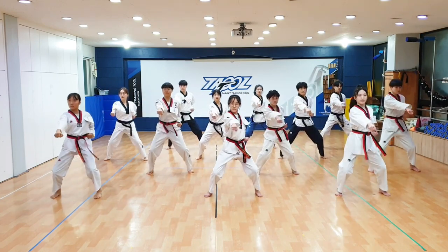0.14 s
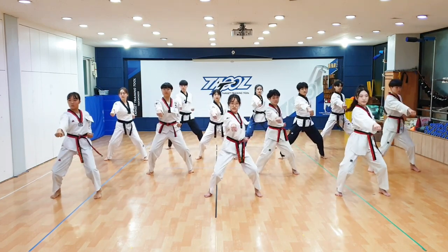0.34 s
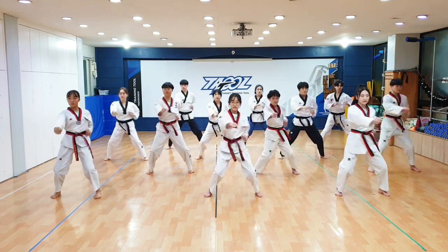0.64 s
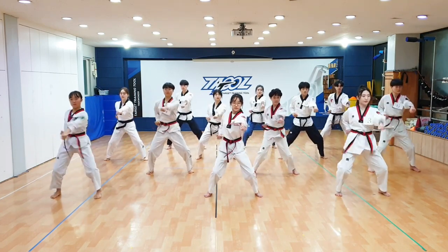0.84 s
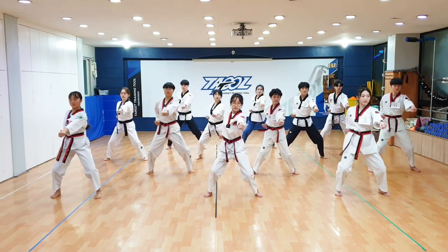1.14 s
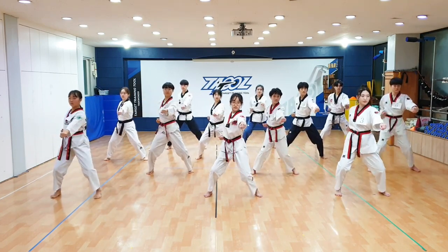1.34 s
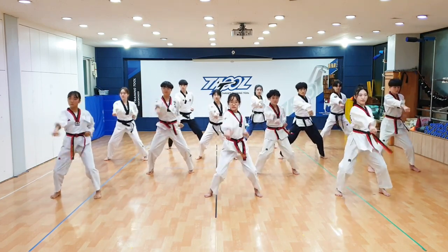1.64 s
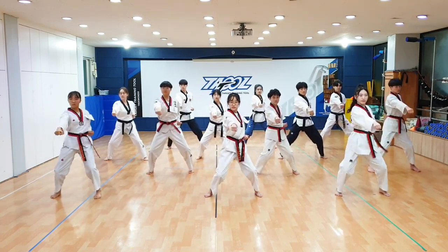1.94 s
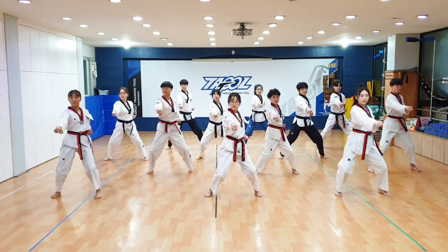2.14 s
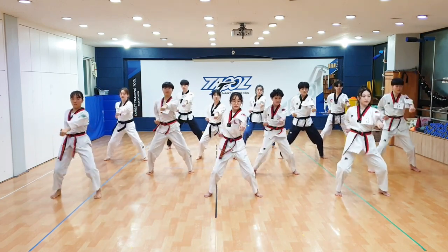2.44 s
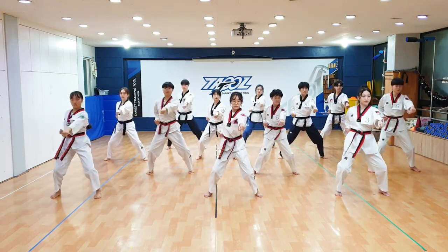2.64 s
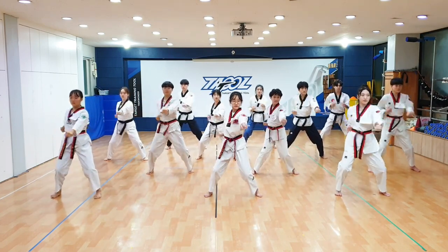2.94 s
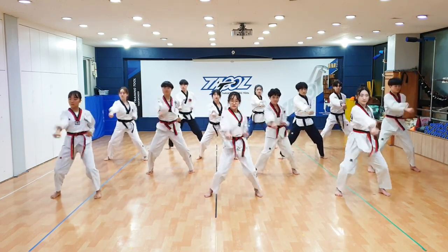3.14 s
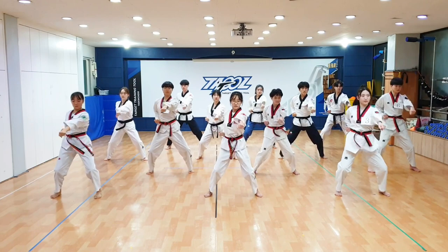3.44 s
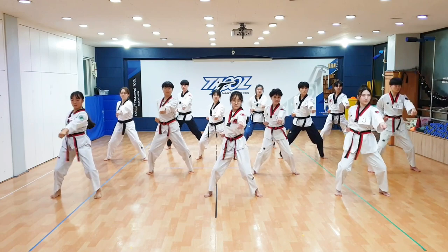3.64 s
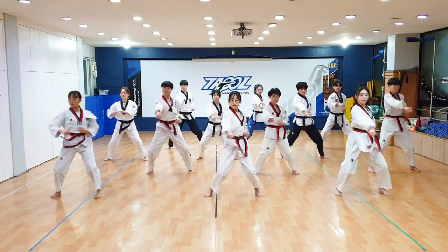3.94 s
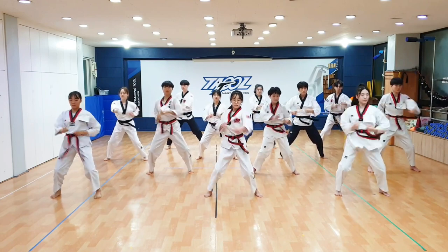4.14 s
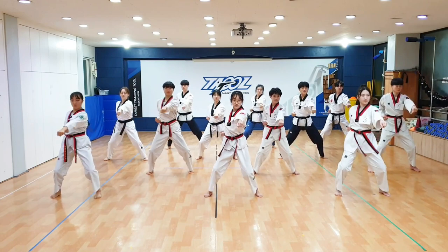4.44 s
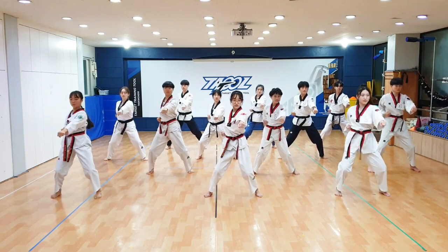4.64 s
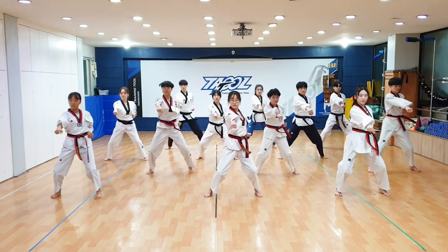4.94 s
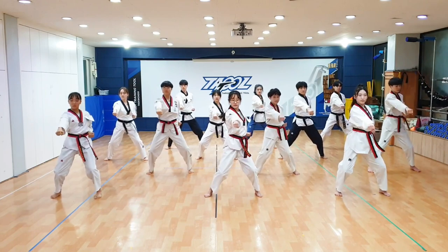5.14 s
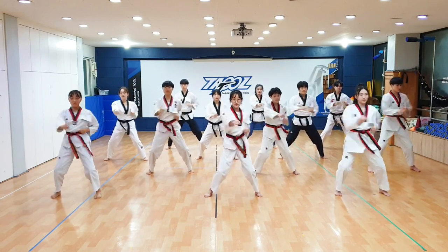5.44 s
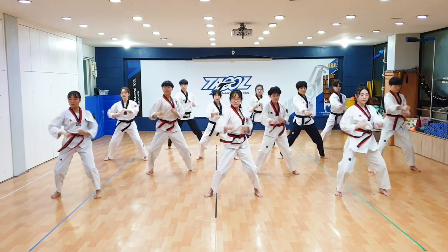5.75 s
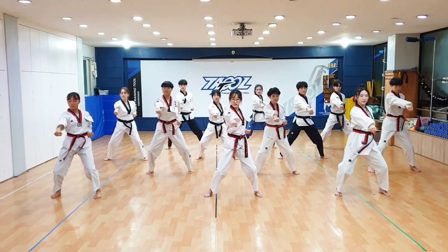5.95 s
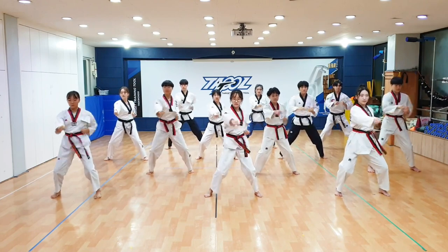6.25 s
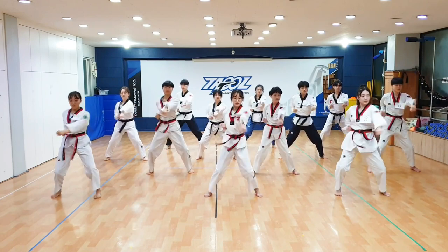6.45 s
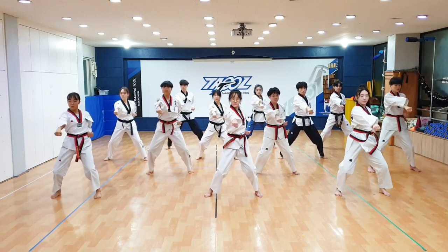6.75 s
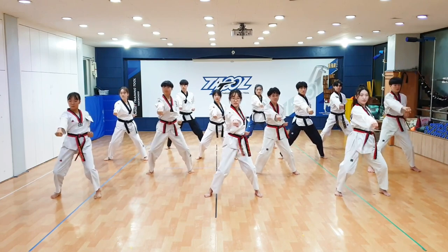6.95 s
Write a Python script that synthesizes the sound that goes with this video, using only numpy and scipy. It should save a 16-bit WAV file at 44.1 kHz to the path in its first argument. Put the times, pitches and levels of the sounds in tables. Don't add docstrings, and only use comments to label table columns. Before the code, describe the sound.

Heavy cloth swishes and dull sleeve cracks land together, singly and in quick runs, in a live indoor hall with soft ventilation noise.

```python
import sys
import numpy as np
from scipy import signal
from scipy.fft import rfft, irfft, next_fast_len
from scipy.io import wavfile

SR = 44100
rng = np.random.default_rng(int(sys.argv[2]) if len(sys.argv) > 2 else 0)


def how_loud(loudness_db):
    steps = np.asarray(loudness_db, float) / 20
    return 10 ** steps


def output_pcm(signal):
    pcm = np.clip(np.atleast_2d(signal).T, -1, 1) * 32767
    wavfile.write(sys.argv[1], SR, np.round(pcm).astype(np.int16))


N = 312986
SIZE = next_fast_len(N + SR)


# body jolt, cloth flap, sleeve rub, weave hiss.
# Edges between the layers in Hz.
LAYER_EDGES_HZ = [44, 130, 1100, 4000, 17000]
FOLDS_PER_S = [150, 900, 4000, 9000]
FOLD_SPREAD_DB = [3.4, 5.2, 3.7, 1.5]


def uniforms(rows):
    out = 0
    free = hush() * flutter()
    lead = SR // 10
    for k, (low, high) in enumerate(zip(LAYER_EDGES_HZ, LAYER_EDGES_HZ[1:])):
        level = free * effort(k)
        for row in rows:
            part = band(row, low, high)
            part = part / np.sqrt(np.sum(part ** 2) / 2 * len(rows))
            grains = folds(FOLDS_PER_S[k], FOLD_SPREAD_DB[k])
            sent = np.zeros(SIZE)
            sent[:N] = level * grains
            sent[-lead:] = level[0] * grains[-lead:]
            out = out + through(sent, part)
    return out


# arm stops at in
# seconds, strength in dB, cloth keeps whipping for in seconds, brightness in dB, swing relative to strength in
# dB.
PUNCHES = [(0.0, -26, 0.053, -5, -1.5), (0.041, -33, .06, 8, -16), (0.821, -20.5, 0.06, 7.5, -9),
           (1.27, -51.5, 0.034, 1, -16), (1.485, -50.5, 0.067, 34, -9), (1.612, -20, 0.12, -1.5, -9.5),
           (2.314, -34, .06, 21, -30.5), (2.418, -21, 0.07, 7, -4), (3.03, -43.5, .06, 10, -7),
           (3.154, -21, 0.077, -7, -5.5), (3.27, -28.5, .05, 2, 0), (3.375, -20.5, 0.042, -7.5, -9),
           (3.437, -27, 0.031, 2, 0), (3.85, -43.5, 0.099, 13, -4.5), (4.006, -22, .11, -1.5, -6),
           (4.14, -28.5, 0.11, -1, -2), (4.24, -22.5, 0.11, -3.5, -2.5), (4.755, -48.5, .07, 25, -17),
           (4.891, -20.5, .13, -1.5, -8), (5.612, -20.5, 0.1, -7, -4.5), (5.825, -18.5, 0.068, -8.5, -3),
           (6.458, -25, 0.14, -6.5, -2.5), (6.648, -18.5, 0.095, -2, -6.5)]
LAYER_DB = [-14, -1.5, -6, -9]
LAYER_BRIGHT = [0.014, 0.061, 0.24, 0.37]
# when it breaks out after the stop, in seconds.
LAYER_LAG_S = [-.012, .001, .001, .001]
SWING_DB = [3.5, 2.5, 2.5, 5]
# growth as the arm speeds up towards the stop, in dB per second.
SWING_DB_PER_S = [168, 130, 121, 116]
# fall while the cloth keeps whipping, in dB per second.
SAG_DB_PER_S = [30, 27, 36, 43.6]
# further fall once it stops whipping, in dB per second.
RELEASE_DB_PER_S = [260, 222, 195, 188]
# level of each layer in dB, and its fall in dB per second.
SETTLE_DB, SETTLE_DB_PER_S = [-17, -21, -10.5, -14], 47.5


def effort(layer):
    swing_s, start_s = 0.2, 0.041
    whip_db, whip_s = 7, 0.037
    rise_s = 0.0081
    t = np.arange(0, N + 64, 64) / SR
    stop_s, db, hold_s, bright_db, swing_db = np.transpose(PUNCHES)[:, :, None]
    since = t - stop_s - LAYER_LAG_S[layer]
    after = np.maximum(since, 0)
    past = np.maximum(since - hold_s, 0)
    swing = how_loud(swing_db + SWING_DB[layer] + SWING_DB_PER_S[layer] * np.minimum(since, 0))
    swing = swing * np.clip((since + swing_s) / start_s, 0, 1)
    fall_db = SAG_DB_PER_S[layer] * after + RELEASE_DB_PER_S[layer] * past
    whip = how_loud(whip_db * np.exp(-after / whip_s) - fall_db)
    settle = how_loud(SETTLE_DB[layer] - SETTLE_DB_PER_S * after)
    stopped = np.minimum(after / rise_s, 1)
    shape = swing ** 2 + stopped * (whip ** 2 + settle ** 2 - swing ** 2)
    strength = how_loud(db + LAYER_DB[layer] + LAYER_BRIGHT[layer] * bright_db)
    power = np.sum(strength ** 2 * shape, axis=0)
    return np.interp(np.arange(N) / SR, t, np.sqrt(power))


def folds(per_s, spread_db):
    when, size = rng.random((2, N))
    hit = when < per_s / SR
    size_db = spread_db * np.minimum(-np.log(size[hit] + 1e-9), 4)
    out = np.zeros(N)
    out[hit] = how_loud(size_db) * np.sign(when[hit] * SR / per_s - .5)
    return rms_one(out)


def flutter():
    depth_db, per_s = 1.3, 45
    knots = rng.standard_normal(round(N / SR * 60))
    return how_loud(depth_db * np.interp(np.arange(N) / SR * per_s, np.arange(len(knots)), knots))


def hush():
    dip_db = np.zeros(N)
    for s, *_ in SNAPS:
        dip_db[max(round((s - .022) * SR), 0):round(s * SR)] = -1.5
    return how_loud(signal.lfilter([.02], [1, -.98], dip_db))


# start in seconds, flap level in dB,
# bright crack level in dB, length in seconds, flap pitch in Hz.
SNAPS = [(0.044, -14, -45, 0.014, 860), (0.735, -34, -60, 0.029, 750), (0.806, -27, -52, .02, 1900),
         (0.823, -14.5, -30.5, 0.031, 450), (1.27, -39.5, -60, 0.023, 1680), (1.622, -13, -41, 0.028, 590),
         (1.634, -17, -50, 0.11, 1560), (2.285, -36, -57, .021, 423), (2.315, -26, -29, 0.026, 2550),
         (2.423, -14, -31.5, 0.022, 367), (3.154, -13.5, -43, .02, 390), (3.376, -17, -47, 0.038, 380),
         (3.432, -15.5, -33.5, 0.014, 340), (4.036, -13, -47, 0.01, 510), (4.26, -18, -42, 0.035, 350),
         (4.892, -15.5, -41, 0.09, 450), (5.61, -21.5, -40.5, 0.022, 2700), (5.825, -10.5, -44, 0.035, 614),
         (6.456, -29, -40.5, 0.043, 660), (6.649, -10.5, -52, 0.026, 615)]
# frequency in Hz, width in Hz, level in dB.
CRACK_MODES = [(2600, 900, -8), (4200, 700, -11), (7500, 1700, 0), (13000, 6000, -14)]


def snaps(near, bare):
    since = np.arange(SR // 4) / SR
    dull, bright = np.zeros(N + SR), np.zeros(N + SR)
    coarse = np.pad(folds(4000, spread_db=3.0), (0, SR))
    fine = folds(12000, spread_db=7.5)
    for s, peak_db, bright_db, length_s, flap_hz in SNAPS:
        start = round(s * SR)
        span = slice(start, start + len(since))
        burst = np.exp(-since / length_s) + 2.0 * np.exp(-since / 0.0048)
        flap = burst * coarse[span]
        flap[0] = 15.4
        pitched = resonance(flap, flap_hz, 0.5 * flap_hz)
        dull[span] += how_loud(peak_db - 11.5) * (0.65 * flap + 2.56 * pitched)
        bright[span] += how_loud(bright_db + 3.0) * burst
    crack = 0
    for k, (hz, width_hz, db) in enumerate(CRACK_MODES):
        crack = crack + (-1) ** k * how_loud(db) * resonance(bare, hz, width_hz)
    crack = crack / np.sqrt(np.sum(crack ** 2) / 2)
    near = near + np.eye(1, near.shape[1])
    return through(dull[:N], band(near, 242, 3030)) + through(bright[:N] * fine, crack)


# start in seconds, level in dB.
BUCKLE = [
    (1.272, -41),
]
# frequency in Hz, level in dB, time to fall 60 dB in seconds.
BUCKLE_MODES = [(1790, 8, 0.01), (8000, -3, .03), (8100, -1, .04), (9100, 2, 0.022)]


def buckle(bare):
    clicks, out = np.full(N, 1e-18), 0
    for s, db in BUCKLE:
        clicks[round(s * SR)] = how_loud(db + 33)
        clicks[round((s + .02) * SR)] = how_loud(db + 25)
    for hz, level_db, t60 in BUCKLE_MODES:
        r = how_loud(-60 / (t60 * SR))
        w = 2 * np.pi * hz / SR
        gain = how_loud(level_db - 36) * np.sin(w)
        out = out + signal.lfilter([0, gain], [1, -2 * r * np.cos(w), r * r], clicks)
    return how_loud(3.0) * through(out, bare)


# frequency in Hz, density in dB per Hz.
AIR = [(20, -40), (40, 0), (110, -3.5), (200, 2), (470, 2.5), (700, -1), (1050, -7), (1750, -3.5),
       (3400, -12.5), (8000, -12.5), (11500, -17), (15000, -43)]


def air_conditioning():
    out = 0
    for lag in (-20, 20):
        out = out + how_loud(-56.5) * through(rng.standard_normal(SIZE), hall(AIR, lag, direct_db=-20.0))
    return out


# frequency in Hz, rms level in dB.
HUM = [(177.6, -61)]


def motor_hum():
    t = np.arange(N) / SR
    return sum(how_loud(db) * np.sqrt(2) * np.sin(2 * np.pi * hz * t) for hz, db in HUM)


# frequency in Hz, time to fall 60 dB in seconds.
HALL_T60 = [(60, 0.22), (200, 0.59), (550, 0.72), (800, 0.46), (1100, 0.32), (1700, 0.77), (2400, 0.54),
            (3500, 0.6), (12000, 0.47)]
# frequency in Hz, likeness from 0 to 1.
LIKENESS = [(40, 0.91), (180, 0.94), (350, 0.9), (700, 0.26), (1300, 0.02), (15000, 0.017)]
BANDS = 22 * 2 ** np.arange(0, 9.8, 1 / 3)


def hall(spectrum, lag, direct_db):
    t = np.arange(SR * 5 // 8) / SR
    direct = np.zeros((2, len(t)))
    direct[0, max(lag, 0)] = direct[1, max(-lag, 0)] = how_loud(direct_db) * np.sqrt(SR)
    out = 0
    white = rng.standard_normal((2, 2, len(t)))
    for k, (low, high) in enumerate(zip(BANDS, BANDS[1:])):
        hz = np.sqrt(low * high)
        t60, alike = at_hz(HALL_T60, hz), at_hz(LIKENESS, hz)
        decay = np.minimum(t / 0.0013, 1) * how_loud(-60 * t / t60)
        mid, side = white[k % 2] * decay / np.sqrt(t60 / np.log(1e6))
        tail = np.sqrt((1 + alike) / 2) * mid + np.sqrt((1 - alike) / 2) * side * [[1], [-1]]
        out = out + how_loud(at_hz(spectrum, hz)) * band(tail + direct, low, high)
    return rms_one(out) / np.sqrt(len(t))


def through(x, response):
    return rfft(x, SIZE) * rfft(response, SIZE)


def resonance(x, hz, width_hz):
    r = np.exp(-np.pi * width_hz / SR)
    poles = [1, -2 * r * np.cos(2 * np.pi * hz / SR), r * r]
    return signal.lfilter([(1 - r * r) / 2, 0, (r * r - 1) / 2], poles, x)


def band(x, low_hz, high_hz):
    return signal.sosfilt(signal.butter(2, [low_hz, high_hz], "band", fs=SR, output="sos"), x)


def at_hz(points, hz):
    points_hz, values = np.transpose(points)
    return np.interp(np.log(hz), np.log(points_hz), values)


def rms_one(x):
    return x / np.sqrt(np.mean(x ** 2) + 1e-20)


# frequency in Hz, density in dB per Hz.
CLOTH = [(18, -45), (30, -17), (59, -5), (140, -6.5), (230, -1.5), (299, -5.5), (399, -4), (467, -6.5),
         (591, -5), (1290, -9.5), (1820, -7.5), (3490, -17.5), (7650, -22.5), (11900, -25.5), (15500, -32)]
ROW_LAGS = [-14, -5, 7, 16]


def scene():
    rows = [hall(CLOTH, lag, direct_db=-9.5) for lag in ROW_LAGS]
    near = hall(CLOTH, lag=4, direct_db=-3.5)
    bare = hall([(20, 0), (20000, 0)], lag=-5, direct_db=-2.0)
    heard = uniforms(rows) + snaps(near, bare) + buckle(bare) + air_conditioning()
    room = irfft(heard, SIZE)[:, :N]
    return (room + motor_hum()) * how_loud([[-0.91], [0.91]])


def low_pass(x):
    return signal.sosfilt(signal.butter(12, 16330, fs=SR, output="sos"), x)


def record(dry):
    cut = signal.sosfilt(signal.ellip(10, .5, 55, 15550, fs=SR, output="sos"), dry)
    return low_pass(cut)


dry = scene()
out = record(dry)
output_pcm(out)
```